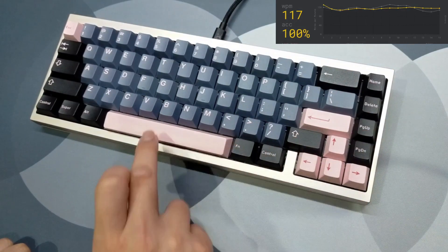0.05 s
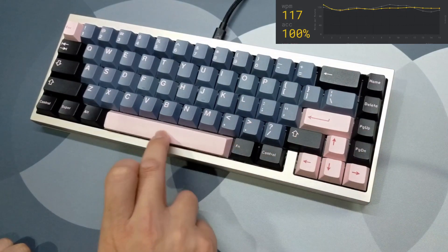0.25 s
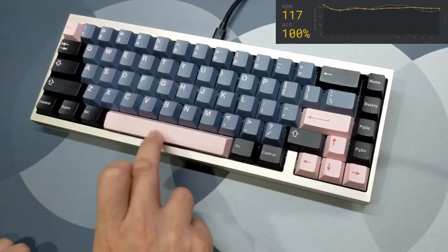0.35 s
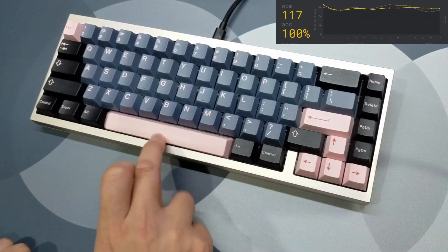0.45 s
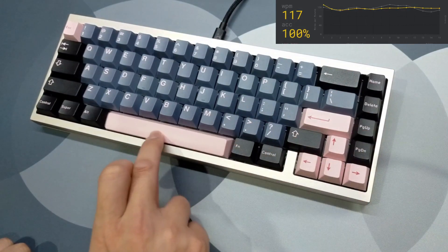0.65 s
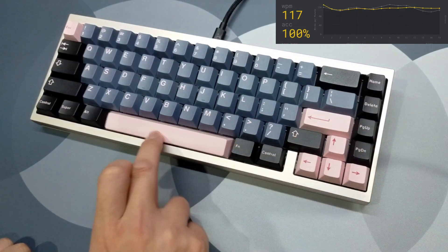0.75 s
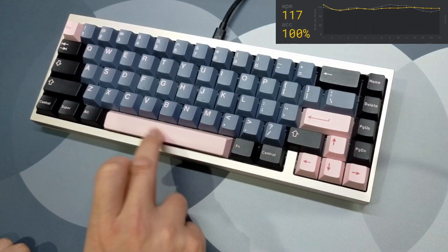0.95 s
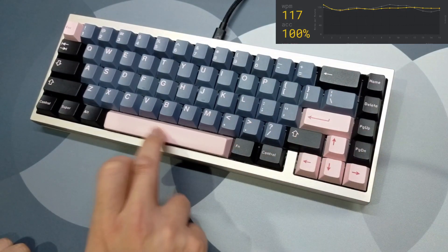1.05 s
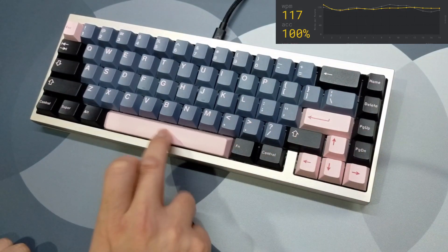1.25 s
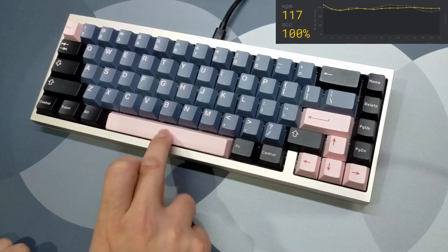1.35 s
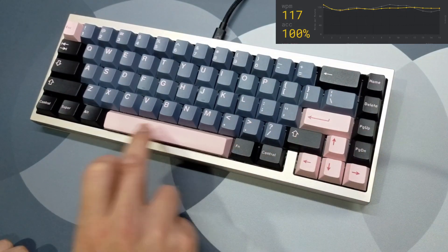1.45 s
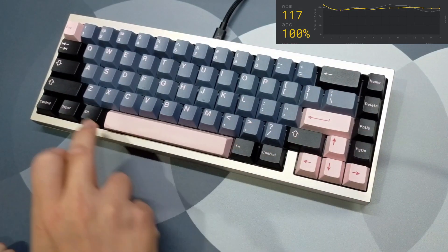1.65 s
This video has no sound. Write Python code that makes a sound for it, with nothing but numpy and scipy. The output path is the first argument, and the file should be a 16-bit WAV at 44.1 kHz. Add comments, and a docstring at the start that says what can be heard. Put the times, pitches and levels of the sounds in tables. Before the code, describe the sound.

A mechanical keyboard spacebar is tapped nine times in a quick, even run. Each sharp, hollow clack comes with a slight desk thud and a soft spring return, close to the microphone in a small room.

```python
"""Nine sharp spacebar clacks on a mechanical keyboard, at a desk in a small room.
Each stroke: a faint finger touch, the clack as the bar bottoms out, a desk thud, a soft spring return.
The room answers every clack alike, with narrow tones ringing on. Room tone and desk tremble lie below.
The close microphone just overloads on the peaks."""
import sys
import numpy as np
from scipy import signal
from scipy.fft import rfft, irfft
from scipy.io import wavfile
from scipy.ndimage import uniform_filter1d

SR = 44100
rng = np.random.default_rng(int(sys.argv[2]) if len(sys.argv) > 2 else 0)


def file_out(sig):
    """Save sig as 16-bit WAV at sys.argv[1]."""
    # one column per channel
    cols = np.atleast_2d(sig).T
    # limit, then scale
    lim = np.clip(cols, -1, 1)
    pcm = np.round(lim * 32767).astype(np.int16)
    wavfile.write(sys.argv[1], SR, pcm)


N = 74970

# room tone spectrum: freq_hz, relative_db
ROOM_TONE_SPECTRUM = [(20, -4), (40, -11), (70, -33), (105, -15.5), (175, -22), (240, -27.5), (300, -25),
                      (520, -34), (1670, -31), (2400, -34.5), (6000, -46), (15500, -47)]
# desk tremble spectrum: freq_hz, relative_db
TREMBLE_SPECTRUM = [(10, -12.5), (27, 0), (45, -5), (70, -14), (100, -12.5), (170, -17), (220, -38),
                    (400, -37), (1500, -66), (8000, -80)]
# desk tremble envelope: time_s, rms_db
TREMBLE_ENVELOPE = [(0, -57), (.2, -56.5), (.3, -48), (.9, -47), (1.45, -54), (1.7, -48.5)]
# finger lands on the bar: start_s, gain_db
TOUCH_EVENTS = [(.2362, -25.5), (0.3863, -29), (0.5319, -26), (0.688, -26), (0.8298, -29.5),
                (0.9546, -23.5), (1.1148, -23.5), (1.2592, -22.5), (1.4063, -23)]
# finger contact spectrum: freq_hz, gain_db
TOUCH_SPECTRUM = [(100, -1), (700, 10), (1200, 20.5), (1500, 11.5), (1950, 19), (2500, 9.5), (3150, 15),
                  (4500, -1), (9000, -6.5), (16000, -10)]
# bar bottoms out: start_s, force_db, treble_db
STROKE_EVENTS = [(0.2489, 0.5, -0.5), (0.4021, -3.5, -5), (0.5461, 0.5, -1), (0.7026, 0, -2),
                 (0.8467, -1.5, -2), (0.9689, 0.16, -0.5), (1.1265, 2.14, -1.5), (1.2718, 1.55, -1.5),
                 (1.4176, 1.8, -1.5)]
# bar and plate resonances: centre_hz, width_hz, peak_db
BAR_RESONANCES = [(633.5, 193, 17.5), (1097, 163, 11.5), (1260, 230, 20), (1524, 112, 18), (1810, 276, 20),
                  (1906, 325, 26.5), (2244, 655, 19.5), (2700, 225, 18.5), (2938, 130, 19), (3182, 590, 16),
                  (3756, 140, 10), (5023, 530, 9), (6610, 510, 9.5), (9180, 1600, -2.5)]
# contact tick spectrum: freq_hz, gain_db
TICK_SPECTRUM = [(100, -5.5), (310, 2), (425, -15), (900, 4), (3500, 4), (4300, 2), (4650, -10),
                 (5600, -10), (7500, -17), (11000, -6), (13500, -18), (16000, -15.5)]
# narrow tones that ring on in the room after each clack: pitch_hz, level_db, t60_s
ROOM_RING_MODES = [(665, -62, 0.18), (710, -57, 0.16), (1228, -44.5, 0.16), (1478, -43, 0.24),
                   (1561, -42.5, 0.26), (1646, -45, 0.12), (1785, -38, 0.19), (1853, -37.5, 0.16),
                   (2327, -47, 0.29), (2972, -46, 0.17), (4770, -56, 0.19), (5090, -59, .16),
                   (8620, -54.5, 0.22)]
# tick scattered among the keycaps: freq_hz, gain_db
GRIT_SPECTRUM = [(100, -30), (2000, 0.5), (4200, -5), (6500, -6), (8000, -12), (11000, -15), (13500, -14),
                 (16000, -20)]
# diffuse room tail spectrum: freq_hz, gain_db
TAIL_SPECTRUM = [(100, -8), (300, -5), (420, -7), (560, 4.5), (690, 3.5), (830, -8.5), (1030, -1.5),
                 (1230, 7), (1500, 10.5), (1850, 15), (2300, 6.5), (2900, 1.5), (3400, -0.5), (4500, -10),
                 (4950, 0.5), (5400, -9), (6400, -8), (7500, -15), (8500, -17), (9500, -16.5),
                 (16000, -19.5)]
# diffuse room tail decay: freq_hz, t60_s
TAIL_DECAY = [(200, 0.19), (700, 0.18), (1400, 0.22), (2000, 0.26), (5000, 0.28), (14000, 0.26)]
# low desk modes: pitch_hz, level_db, t60_s
DESK_MODES = [(45.1, -42, 0.31), (63, -36.5, 0.14), (103.7, -47.5, 0.15), (168, -53, 0.11)]
# early reflections: delay_s, gain_db
REFLECTIONS = [(.00633, -33.5), (.0085, -32), (.01235, -24.5), (.0129, -22.5), (.01345, -23.5),
               (.0242, -27.5), (.02687, -25.5)]
# bar springs back to its stop: start_s, gain_db
RETURN_EVENTS = [(.325, -21), (.470, -20), (.624, -22.5), (.768, -19), (.902, -22), (1.042, -18),
                 (1.195, -18.5), (1.341, -10), (1.489, -17.5)]
# return contact spectrum: freq_hz, gain_db
RETURN_SPECTRUM = [(100, 12.5), (300, 11.5), (450, 1.5), (750, 0), (1100, 15.5), (1500, 3.5), (3100, 2.5),
                   (4500, -12), (16000, -29)]

FFT_SIZE = 32768
GRID_HZ = np.fft.rfftfreq(FFT_SIZE, 1 / SR)


def amp(db):
    """Decibels to gain."""
    return 10 ** (np.asarray(db) / 20)


def lookup(table, hz):
    """Table value on a log-frequency axis."""
    table_hz, values = np.transpose(table)
    return np.interp(np.log(hz + 1), np.log(table_hz + 1), values)


def add(mix, start_s, sound):
    """Mix in place at start_s."""
    part = mix[round(start_s * SR):][:len(sound)]
    part += sound[:len(part)]


def minimum_phase(gain):
    """Quickest impulse response with this gain on GRID_HZ."""
    log_gain = np.log(np.maximum(gain, 1e-5))
    mirrored = np.r_[log_gain, log_gain[-2:0:-1]]
    spectrum = np.exp(signal.hilbert(mirrored).conj())
    return np.fft.ifft(spectrum).real[:4096]


def whiten(x, width_hz):
    """Even the spectrum to gain 1 over bands of width_hz."""
    spectrum = rfft(x, FFT_SIZE)
    power = uniform_filter1d(abs(spectrum) ** 2, int(width_hz / GRID_HZ[1]))
    return irfft(spectrum / np.sqrt(abs(power) + 1e-12))[:len(x)]


def noise(spectrum):
    """Steady coloured noise, rms 1."""
    gain = amp(lookup(spectrum, np.fft.rfftfreq(N, 1 / SR)))
    x = irfft(rfft(rng.standard_normal(N)) * gain, N)
    return x / x.std()


def burst(spectrum, decay_s, size=2048):
    """Short rough contact: decaying noise, whitened, then coloured."""
    rough = rng.standard_normal(size) * np.exp(-np.arange(size) / SR / decay_s)
    colour = minimum_phase(amp(lookup(spectrum, GRID_HZ)))
    return signal.fftconvolve(whiten(rough, width_hz=500), colour)


def room_tone(rms_db=-47.5):
    """Steady low room noise."""
    return amp(rms_db) * noise(ROOM_TONE_SPECTRUM)


def desk_tremble():
    """The desk rumbles under the hand."""
    rms_db = np.interp(np.arange(N) / SR, *np.transpose(TREMBLE_ENVELOPE))
    return amp(rms_db) * noise(TREMBLE_SPECTRUM)


def soft_contacts(events, spectrum, decay_s):
    """Finger on bar, or bar on its stop: a fresh burst per event."""
    out = np.zeros(N)
    for start_s, gain_db in events:
        add(out, start_s, amp(gain_db) * burst(spectrum, decay_s))
    return out


def bar_knock(treble_db, shelf_hz=4080):
    """Hollow knock of the bar: a sharp tick and broad resonances struck at once."""
    resonance_power = sum((amp(peak_db) / (1 + (2 * (GRID_HZ - centre_hz) / width_hz) ** 2)) ** 2
                          for centre_hz, width_hz, peak_db in BAR_RESONANCES)
    tick_power = amp(lookup(TICK_SPECTRUM, GRID_HZ)) ** 2
    shelf = amp(treble_db * GRID_HZ ** 2 / (GRID_HZ ** 2 + shelf_hz ** 2))
    return minimum_phase(shelf * np.sqrt(resonance_power + tick_power))


def ringing(modes):
    """Room ring or desk thud: decaying sines that start together."""
    t = np.arange(SR // 2) / SR
    return sum(amp(db - 60 * t / t60_s) * np.sin(2 * np.pi * hz * t) for hz, db, t60_s in modes)


def room_tail(onset_s=0.00067, rise_s=0.0028):
    """Diffuse tail of one clack; each band decays at its own rate."""
    hz, t, bands = signal.stft(rng.standard_normal(SR // 2), SR, nperseg=256)
    decay = amp(-60 * t / lookup(TAIL_DECAY, hz)[:, None])
    _, tail = signal.istft(bands * decay, SR, nperseg=256)
    colour = minimum_phase(amp(lookup(TAIL_SPECTRUM, GRID_HZ)))
    tail = signal.fftconvolve(whiten(tail, width_hz=140), colour)
    fade_in = np.clip((np.arange(len(tail)) / SR - onset_s) / rise_s, 0, 1)
    return tail * fade_in


def surroundings(desk_lag_s=0.00417, reflection_cutoff_hz=2400):
    """Response to one clack: room tail, room ring, desk thud, dull early reflections."""
    response = room_tail()
    add(response, 0, ringing(ROOM_RING_MODES))
    add(response, desk_lag_s, ringing(DESK_MODES))
    lowpass = signal.butter(2, reflection_cutoff_hz, fs=SR)
    dull_knock = signal.lfilter(*lowpass, bar_knock(treble_db=0))
    for delay_s, gain_db in REFLECTIONS:
        add(response, delay_s, amp(gain_db) * dull_knock)
    return response


def clacks(grit_lag_s=0.0005):
    """The bar bottoms out: knock, keycap grit and surroundings, scaled by force."""
    response = surroundings()
    grit = burst(GRIT_SPECTRUM, decay_s=0.0016)
    out = np.zeros(N)
    for start_s, force_db, treble_db in STROKE_EVENTS:
        add(out, start_s, amp(force_db) * bar_knock(treble_db))
        add(out, start_s + grit_lag_s, amp(force_db + treble_db) * grit)
        add(out, start_s, amp(force_db) * response)
    return out


def scene():
    """Mono mix at the microphone."""
    strokes = clacks()
    touches = soft_contacts(TOUCH_EVENTS, TOUCH_SPECTRUM, decay_s=0.0066)
    returns = soft_contacts(RETURN_EVENTS, RETURN_SPECTRUM, decay_s=0.0056)
    return (room_tone() + desk_tremble() + touches + strokes + returns)[None]


def record(dry):
    """Soft microphone overload, then a low-pass."""
    ceiling, knee, cutoff_hz = 0.54, 3.34, 16200
    clipped = dry / (1 + abs(dry / ceiling) ** knee) ** (1 / knee)
    lowpass = signal.firwin(255, cutoff_hz, window=("kaiser", 9), fs=SR)
    return signal.oaconvolve(clipped, lowpass[None], "same")


dry = scene()
out = record(dry)
file_out(out)
```